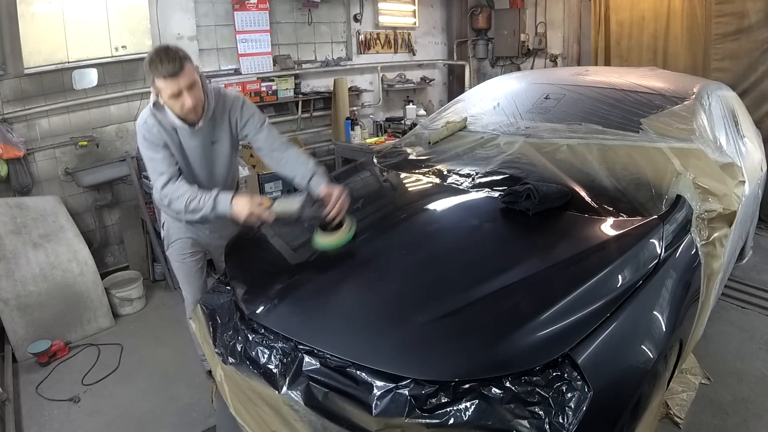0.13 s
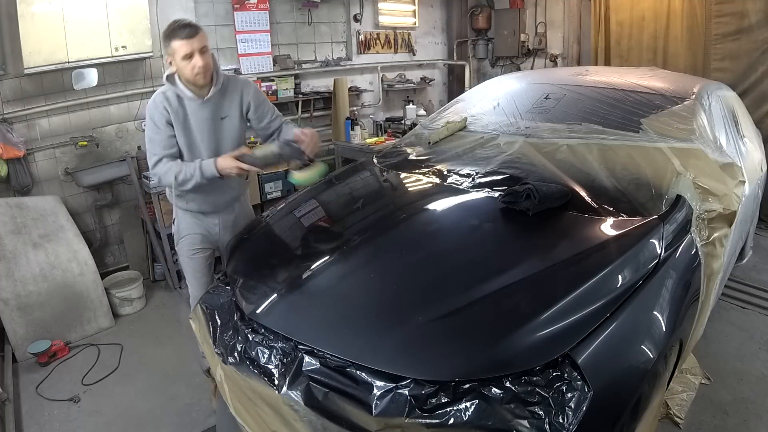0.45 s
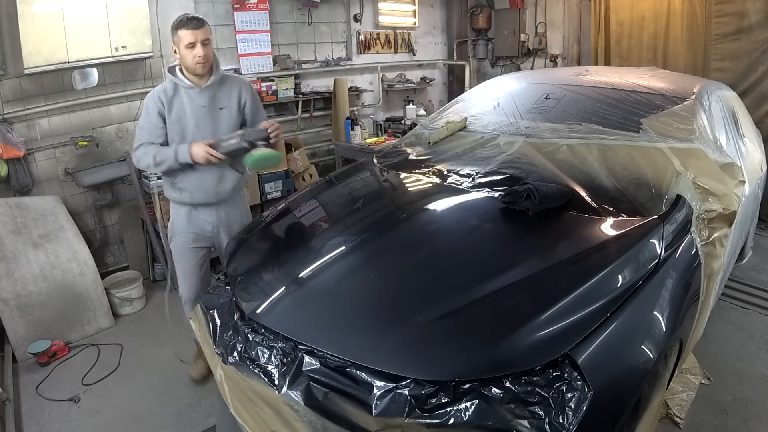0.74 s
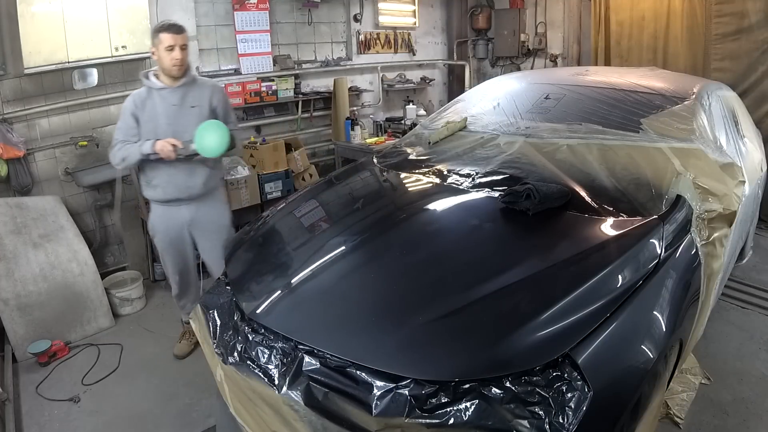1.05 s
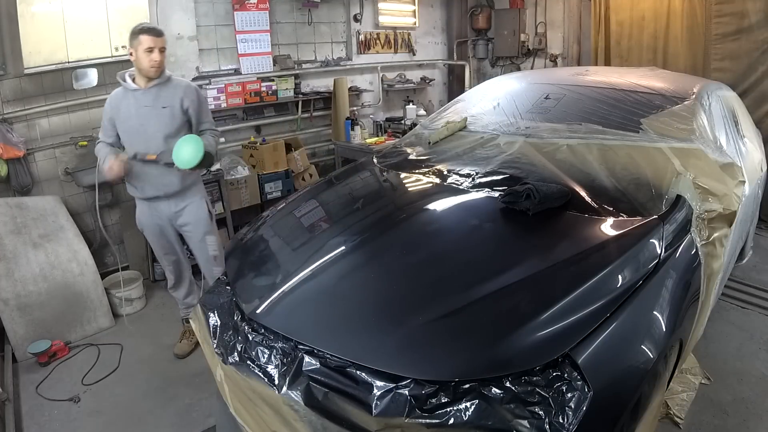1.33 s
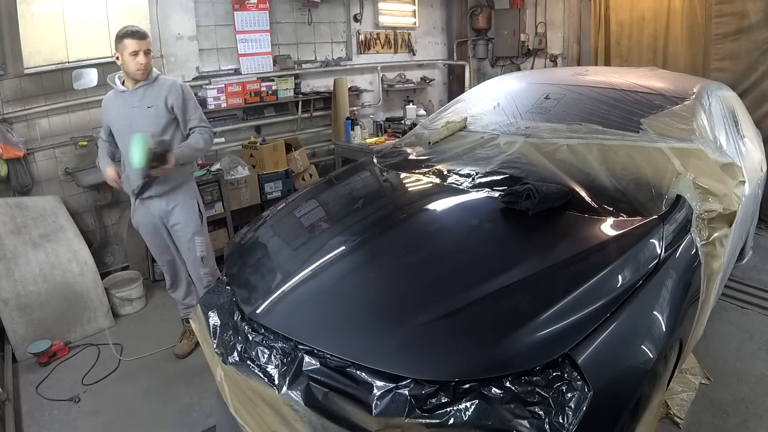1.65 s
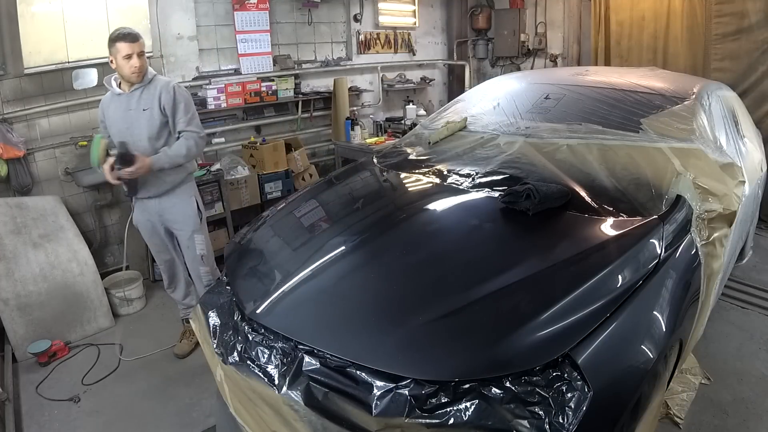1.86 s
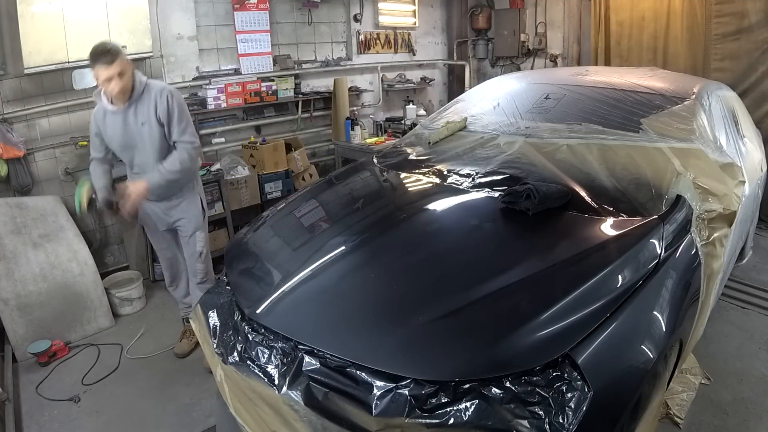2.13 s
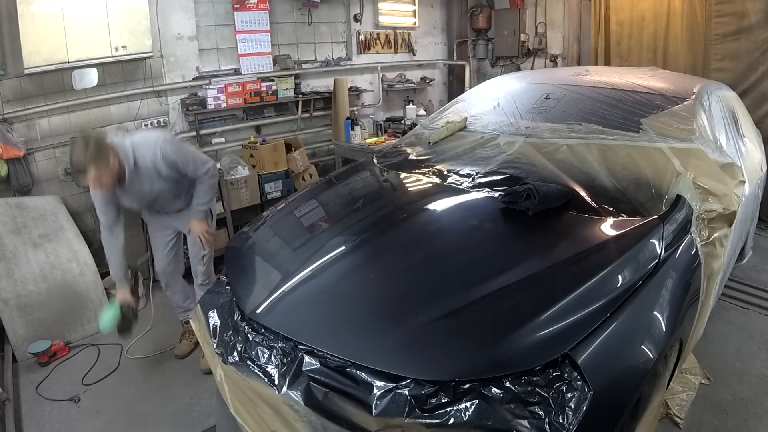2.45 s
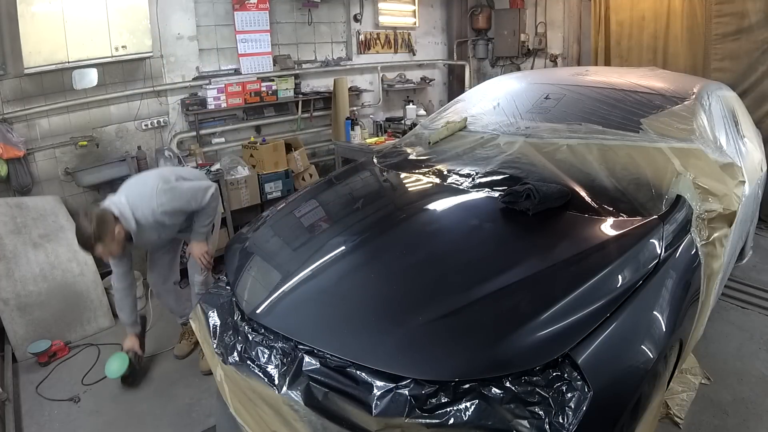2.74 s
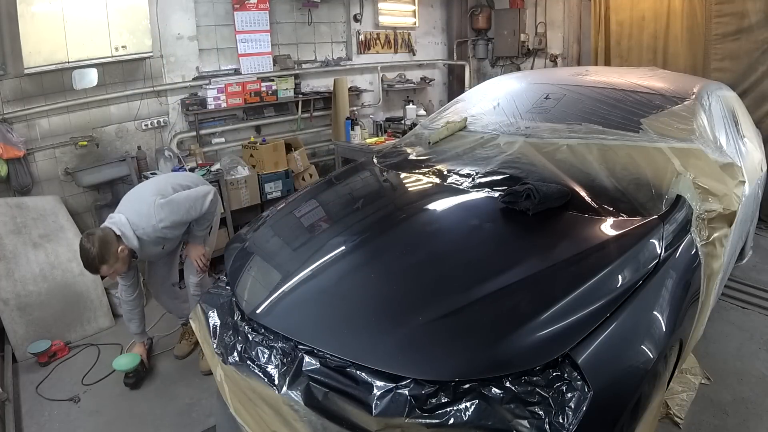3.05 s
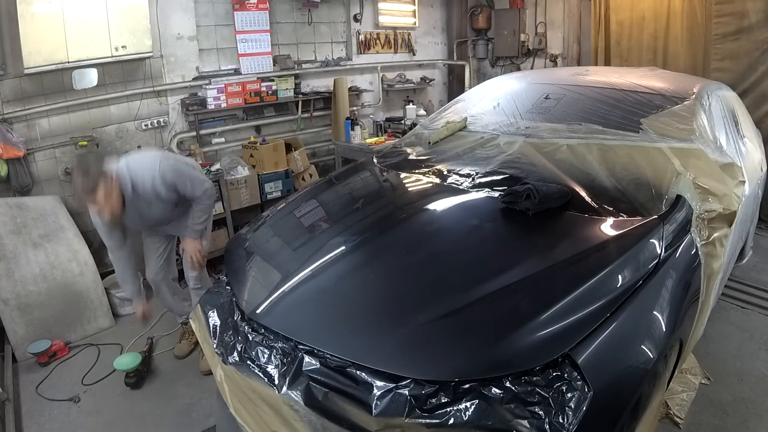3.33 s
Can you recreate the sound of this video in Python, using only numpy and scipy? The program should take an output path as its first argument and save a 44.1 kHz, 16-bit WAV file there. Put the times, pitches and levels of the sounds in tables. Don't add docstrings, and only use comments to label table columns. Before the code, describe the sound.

Electric polisher motor coasting down in pitch and loudness, ending with a rattling set-down thud.

```python
import sys
import numpy as np
from scipy import signal
from scipy.io import wavfile

SR = 44100
rng = np.random.default_rng(int(sys.argv[2]) if len(sys.argv) > 2 else 0)


def gain_from_db(level_db):
    decades = np.asarray(level_db, float) / 20
    return 10 ** decades


def transcribe(signal):
    frames = np.atleast_2d(signal).T
    limited = np.clip(frames, -1, 1)
    pcm = np.round(limited * 32767).astype(np.int16)
    wavfile.write(sys.argv[1], SR, pcm)


N = 154350

# (time [s], speed [turns/s])
ROTOR_SPEED = [(0, 220), (.08, 217.5), (.2, 217.5), (.28, 223), (.32, 233), (.44, 226.5), (.6, 217.7),
               (1.0, 196.8), (1.5, 171.8), (2.0, 151), (2.5, 131.7), (3.0, 114.3), (3.5, 99)]
# (time [s], level [dB])
RUSH_LEVEL = [(0.0, -36), (0.02, -38.5), (0.06, -37.5), (0.24, -38.5), (0.31, -35.5), (0.37, -39.5),
              (0.66, -42), (1.63, -50), (2.07, -50), (2.1, -49.5), (2.16, -50), (3.018, -53), (3.03, -50.5),
              (3.5, -53)]

# (multiple of rotor speed [-], level re rush [dB])
SHAFT_TONES = [(1, -18), (2, -14)]
GEAR_TONES = [(4, -6), (5, 3), (6, -13), (7, -14), (9, -14), (10, 1), (14, -7), (15, -7), (16, -12)]
BEARING_TONES = [(3.5, -6), (4, -11), (4.5, -7), (5, -8), (6, -8), (7, -10)]
OUTLET_TONES = [(12, -7), (15, -9)]
SLOT_TONES = [(30, -15), (36, -10), (60, -14), (84, -13)]
BAR_TONES = [(24, -8), (48, -12), (72, -11), (96, -10), (120, -9)]
# (frequency [Hz], gain [dB])
HOUSING_GAIN = [(160, -9), (180, -1), (195, 7), (205, 3), (212, -6), (300, -7), (370, 0), (412, 13),
                (445, -12), (690, -9), (770, 2), (870, -4), (1000, 0)]
# (frequency [Hz], gain [dB])
COWL_GAIN = [(1400, -14), (1560, -1), (2000, -1), (2250, -10), (2470, 0), (2650, -1), (2850, 3), (3200, 0)]
# (frequency [Hz], gain [dB])
CASING_SHADOW = [(5600, 0), (8000, -4), (11000, -11), (15000, -14)]
# (lower edge [Hz], upper edge [Hz])
GEAR_CASE_BAND = [735, 835]

# (start [s], end [s], slot tone [dB], blade tone [dB])
FAN_OUTLET = [
    (.29, .45, -4, -2),
    (.45, .6, -3, 0),
    (.6, .72, -6, 2),
    (.72, .95, 0, 0),
    (.96, 1.24, -4, 4),
    (1.24, 1.43, -6, -4),
    (1.43, 2.36, -1, -5),
    (2.34, 2.5, -6, 3),
    (2.54, 2.75, 3, 4),
    (2.75, 3.6, -4, -6),
]
# (start [s], end [s], first bar tone [dB], second bar tone [dB], slot tones [dB])
MOTOR_VENTS = [(.31, .39, -5, 2, -5), (.39, .52, 2, 4, 1), (.52, .62, -5, 0, 0), (.72, .85, -12, -12, -10),
               (1.4, 2.04, -13, -14, -13), (2.05, 2.16, -7, 4, 4), (2.2, 2.5, -14, -14, -7),
               (2.85, 2.91, 3, 4, -8), (2.91, 3.01, 5, -1, -8), (3.035, 3.1, 1, 9, -7),
               (3.09, 3.15, 8, -1, -6), (3.15, 3.25, 4, 0, -9), (3.26, 3.4, 7, -1, -8)]
# (start [s], end [s], top bar tones [dB])
REAR_VENT_TURNS = [
    (2.05, 2.16, -6),
    (2.84, 2.96, 4),
    (2.96, 3.02, -3),
    (3.04, 3.1, 4),
    (3.1, 3.18, 8),
    (3.18, 3.33, 2),
    (3.35, 3.4, 0),
]

# (frequency [Hz], density [dB per Hz])
AIR_LOADED = [(35, -88), (60, -64), (298, -14), (976, -9), (1100, -13), (1230, -15.5), (3190, -14),
              (13800, -34), (15500, -47)]
AIR_FAST = [(60, -85), (150, -55), (260, -22), (413, -3.5), (475, -11), (738, -7), (1450, -8.5),
            (15500, -24.5)]
AIR_MIDDLE = [(60, -66), (175, -54), (298, -16), (385, -9.5), (657, -0.5), (1450, -9.5), (1950, -9.5),
              (4220, -12.5), (15500, -26.5)]
AIR_SLOW = [(60, -88), (705, -7), (869, -2.5), (1077, -4), (1357, -19), (1700, -8.5), (5580, -16.5),
            (15500, -28.5)]
# (frequency [Hz], width [Hz], level [dB])
HOUSING_CAVITIES = [(420, 90, -18), (760, 80, 0), (860, 90, 0), (1100, 150, -5)]
# (time [s], length [s], level [dB])
PAD_PEEL = (.309, .005, -46)

# (time [s], peak [dB], brightness [dB])
CONTACTS = [(1.039, -50, -38), (1.628, -74, -9), (3.023, -35, 6.5), (3.049, -34.5, -24),
            (3.089, -38.5, 0.5), (3.161, -35.5, -24), (3.181, -34.5, -9), (3.205, -27, -6),
            (3.234, -38.5, -19), (3.265, -35.5, -15), (3.303, -41.5, -21), (3.331, -40, -23)]
# (frequency [Hz], level [dB], decay time T60 [s])
BODY_LOW_MODES = [(120, -15, 0.12), (168, -10, 0.06), (188, -3, 0.11), (212, 1, 0.14), (312, -20, 0.06)]
BODY_HIGH_MODES = [(440, -33, 0.066), (820, -8.5, 0.5), (866, -2, 0.16), (920, -28, 0.075),
                   (1210, -8, 0.064), (2120, -23, 0.047), (3550, -5, 0.051)]
# (time [s], length [s], level [dB])
CLOTH_BRUSH = [
    (2.325, 0.064, -70.5),
    (2.46, 0.096, -73),
]

# (frequency [Hz], correlation [-])
EAR_LIKENESS = [(60, .9), (130, 0.75), (290, 1), (640, 0.95), (1000, 0.98), (1500, 0.15), (15000, -1.08)]
# (frequency [Hz], difference [dB])
EAR_LEAN = [(60, -3), (200, -0.5), (380, -3.5), (1290, 0), (2380, 6.5), (4400, 5), (8120, 34.5),
            (15000, 101)]
# (frequency [Hz], width [Hz])
WEAK_BANDS = [(10000, 200), (11300, 200), (13150, 300)]

LIFT_S, LIFT_FADE_S = .288, .008
PAD_OFF_S, PAD_OFF_FADE_S = .265, .025
PAD_DAMPS_DB, EASE_S = -12, .17
PAD_SHAKE_DB, PAD_SETTLES_S = 8, .38
UNBALANCE_DB_PER_OCTAVE = 30
FAST_RPS, MIDDLE_RPS, SLOW_RPS = 212, 160, 122
RUSH_DB, HOLLOW_DB = -2.5, -13.5
VENT_FADE_S = .025
CONTACT_S, STRIKE_DB = 0.0012, -6
CRACK_DB, CRACK_T60_S = -14, 0.041
RATTLE_DB, RATTLE_T60_S = -19.5, 0.3
FLOOR_HUM_S, FLOOR_HUM_DB = 3.385, -57
SHOP_T60_S, SHOP_DB, WALL_CUT_HZ = 0.8, -26, 1700
TOP_CUT_HZ, RIGHT_LAG_SAMPLES = 15150, 8
TIME = np.arange(N) / SR


def rms_one(x):
    return x / np.sqrt(np.mean(x ** 2) + 1e-20)


def in_time(rows):
    return np.interp(TIME, *np.transpose(rows))


def at_hz(points, hz):
    return np.interp(np.log(hz), np.log(np.array(points)[:, 0]), np.array(points)[:, 1])


def noise_band(edges, order=2, kind="band", noise=None):
    if noise is None:
        noise = rng.standard_normal(N)
    return signal.sosfilt(signal.butter(order, edges, kind, fs=SR, output="sos"), noise)


def sides(hz):
    lean = gain_from_db(at_hz(EAR_LEAN, hz) / 2)
    return np.array([lean, 1 / lean]).reshape(2, -1) * 2 / np.sqrt(2 * lean ** 2 + 2 / lean ** 2)


def drift(rate):
    r = np.exp(-80 * np.pi * rate / SR)
    slow = signal.lfilter([1], [1, -2 * r, r * r], rng.standard_normal(N // 40 + 2002))[2000:]
    return np.interp(np.arange(N) / 40, np.arange(len(slow)), rms_one(slow))


def ring(x, hz, t60):
    r, w = gain_from_db(-60 / (t60 * SR)), 2 * np.pi * hz / SR
    return signal.lfilter([0, np.sin(w)], [1, -2 * r * np.cos(w), r * r], x + 1e-18)


def decaying_hits(times, levels_db, t60):
    hit = np.zeros(N)
    hit[times] = gain_from_db(levels_db)
    return signal.lfilter([1], [1, -gain_from_db(-60 / (t60 * SR))], hit)


def step_down(s, fade_s):
    return 1 / (1 + np.exp(np.clip((TIME - s) / fade_s, -50, 50)))


def facing(rows, column):
    gain = 0
    for row in rows:
        inside = np.minimum(TIME - row[0], row[1] - TIME)
        gain = gain + gain_from_db(row[column]) * np.clip(inside / VENT_FADE_S + .5, 0, 1)
    return gain


def tones(orders, speed, flutter_db, wobble):
    turn, out = 2 * np.pi * np.cumsum(speed) / SR, 0
    for k, level_db in orders:
        hz = k * speed
        body_db = np.where(hz < 1300, at_hz(HOUSING_GAIN, hz), at_hz(COWL_GAIN, hz))
        body_db = body_db + at_hz(CASING_SHADOW, hz)
        apart = 1 - np.clip(at_hz(EAR_LIKENESS, hz.mean()), 0, 1)
        own = np.array([drift(10.5), drift(3.1)]) * apart
        phase = k * turn + rng.uniform(0, 6) + wobble * np.sqrt(k) * drift(22) + own
        gain = gain_from_db(level_db + body_db + flutter_db * (drift(26) + .6 * own[::-1]))
        out = out + np.sqrt(2) * gain * sides(hz) * np.sin(phase) * (hz < TOP_CUT_HZ)
    return out


def shaft(speed):
    shake_db = PAD_DAMPS_DB * step_down(EASE_S, .02) + PAD_SHAKE_DB * step_down(PAD_SETTLES_S, .03)
    shake_db = shake_db + UNBALANCE_DB_PER_OCTAVE * np.log2(speed / 210)
    return gain_from_db(shake_db) * tones(SHAFT_TONES, speed, flutter_db=1.5, wobble=.15)


def gears(speed, load):
    return load * tones(GEAR_TONES, speed, flutter_db=1.8, wobble=.14)


def air(speed, load, patchy_db):
    out, upper, together = 0, 0, drift(10)
    edges = 60 * 2 ** np.arange(0, 8.2, 1 / 3)
    white = rng.standard_normal((2, 2, N))
    for k, (low, high) in enumerate(zip(edges, edges[1:])):
        mid, side = noise_band([low, high], noise=white[k % 2])
        hz = np.sqrt(low * high)
        alike = np.clip(at_hz(EAR_LIKENESS, hz), -1, 1)
        densities = [at_hz(table, hz) for table in (AIR_SLOW, AIR_MIDDLE, AIR_FAST)]
        free_db = np.interp(speed, [SLOW_RPS, MIDDLE_RPS, FAST_RPS], densities)
        colour = gain_from_db(free_db + load * (at_hz(AIR_LOADED, hz) - free_db))
        upper = upper + colour ** 2 * (high - low) / SR * 2 * (1500 < hz < 12000)
        gain = colour * gain_from_db(patchy_db * (0.15 * together + drift(15)))
        pair = np.sqrt(1 + alike) * mid + np.sqrt(1 - alike) * side * [[1], [-1]]
        out = out + gain * sides(hz) * pair
    return out / np.sqrt(upper)


def hollow():
    out = 0
    for hz, width, level_db in HOUSING_CAVITIES:
        once = ring(rng.standard_normal(N), hz, 3.0 / width)
        out = out + gain_from_db(level_db + 2 * drift(3.2)) * rms_one(ring(once, hz, 3.0 / width))
    return out


def bearings(speed, load):
    free = (1 - load) * tones(BEARING_TONES, speed, flutter_db=2.5, wobble=.25)
    return noise_band(GEAR_CASE_BAND, order=3, noise=free)


def beamed(rows, column, orders, speed):
    return facing(rows, column) * tones(orders, speed, flutter_db=2.2, wobble=.13)


def fan(speed):
    return beamed(FAN_OUTLET, 2, OUTLET_TONES[:1], speed) + beamed(FAN_OUTLET, 3, OUTLET_TONES[1:], speed)


def peel():
    s, length, level_db = PAD_PEEL
    hiss = noise_band(6500, kind="high", noise=rng.standard_normal((2, N)))
    return gain_from_db(level_db) * sides(9000) * hiss * np.exp(-((TIME - s) / length) ** 2)


def armature(speed):
    low_bars = beamed(MOTOR_VENTS, 2, BAR_TONES[:1], speed) + beamed(MOTOR_VENTS, 3, BAR_TONES[1:2], speed)
    slots = beamed(MOTOR_VENTS, 4, SLOT_TONES, speed)
    return low_bars + slots + beamed(REAR_VENT_TURNS, 2, BAR_TONES[2:], speed)


def knocks():
    s, level_db, bright_db = np.transpose(CONTACTS)
    out, size = np.zeros(N), int(CONTACT_S * SR)
    push = np.exp(-4 * np.arange(size) / size)
    for modes, extra_db, share in ((BODY_LOW_MODES, 0 * s, 1), (BODY_HIGH_MODES, bright_db, .15)):
        soft = push ** (1 / share)
        for hz, mode_db, t60 in modes:
            clicks = np.zeros(N)
            strength_db = level_db + mode_db + extra_db + STRIKE_DB + 2 * rng.standard_normal(len(s))
            clicks[(s * SR).astype(int)] = gain_from_db(strength_db)
            out += ring(np.convolve(clicks, soft / soft.sum())[:N], hz, t60)
    return noise_band(140, kind="high", noise=out)


def crack():
    s, level_db, bright_db = np.transpose(CONTACTS)
    early = (s * SR).astype(int) - 60
    burst = decaying_hits(early, level_db + 2 * bright_db + CRACK_DB - 5, CRACK_T60_S)
    return burst * rms_one(noise_band([800, 4200]))


def rattle():
    s, level_db, _ = np.transpose(CONTACTS)
    shake = decaying_hits((s * SR).astype(int), level_db + RATTLE_DB, RATTLE_T60_S)
    return shake * gain_from_db(0.64 * drift(77)) * rms_one(noise_band([110, 900]))


def shop(x):
    out, dull = np.zeros((2, N)), np.exp(-2 * np.pi * WALL_CUT_HZ / SR)
    for k, lag in enumerate((rng.uniform(0.011, 0.058, size=8) * SR).astype(int)):
        loop, gain, state = x.copy(), gain_from_db(-60 * lag / SR / SHOP_T60_S), [0.]
        for i in range(lag, N, lag):
            back, state = signal.lfilter([gain * (1 - dull)], [1, -dull], loop[i - lag:i], zi=state)
            loop[i:i + lag] += back[:N - i]
        out[k % 2] += (loop - x) * (-1) ** (k // 2)
    return out


def brush():
    noise = rng.standard_normal(N)
    low = rms_one(noise_band([130, 235], noise=noise))
    high = rms_one(noise_band([240, 356], noise=noise))
    out = 0
    for (s, length, level_db), rustle in zip(CLOTH_BRUSH, (low + high, high)):
        out = out + gain_from_db(level_db) * rustle * np.exp(-((TIME - s) / length) ** 2)
    return out


def floor_hum(speed):
    on = np.clip((TIME - FLOOR_HUM_S) / .03, 0, 1)
    return on * gain_from_db(FLOOR_HUM_DB + 2.0 * drift(18)) * np.sin(4 * np.pi * np.cumsum(speed) / SR)


def scene():
    speed, level = in_time(ROTOR_SPEED), gain_from_db(in_time(RUSH_LEVEL))
    load = step_down(LIFT_S, LIFT_FADE_S)
    pad_rubs = step_down(PAD_OFF_S, PAD_OFF_FADE_S)
    whine = shaft(speed) + gears(speed, load) + bearings(speed, load) + fan(speed) + armature(speed)
    rush = gain_from_db(RUSH_DB) * air(speed, pad_rubs, patchy_db=1.3)
    tool = level * (whine + rush + gain_from_db(HOLLOW_DB) * hollow() * sides(670))
    hits = knocks() + crack() + rattle() + brush() + floor_hum(speed)
    dry = tool + peel() + hits * sides(820) + gain_from_db(SHOP_DB) * shop(hits)
    right = np.interp(np.arange(N) - RIGHT_LAG_SAMPLES, np.arange(N), dry[1])
    return np.array([dry[0], right])


def top_cut(x):
    return signal.sosfilt(signal.butter(12, 15960, fs=SR, output="sos"), x)


def record(dry):
    x = noise_band(100, kind="high", noise=dry)
    for hz, width in WEAK_BANDS:
        x = x - .8 * signal.lfilter(*signal.iirpeak(hz, hz / width, fs=SR), x)
    x = signal.sosfilt(signal.ellip(12, .5, 70, TOP_CUT_HZ, fs=SR, output="sos"), x)
    return top_cut(x)


dry = scene()
out = record(dry)
transcribe(out)
```